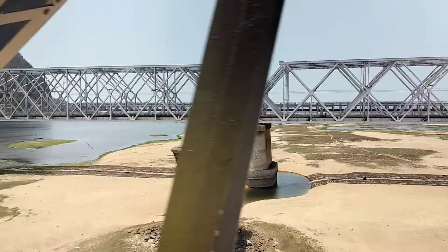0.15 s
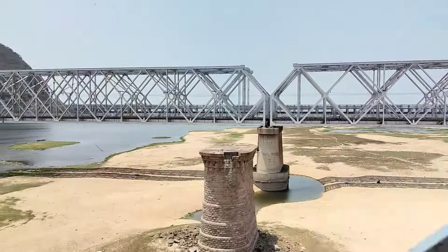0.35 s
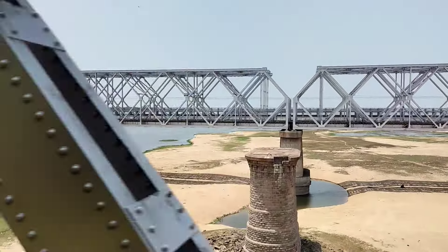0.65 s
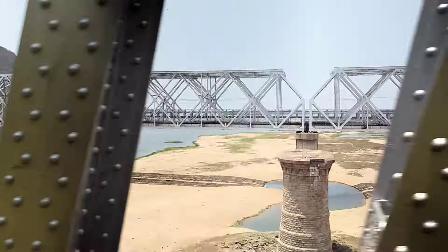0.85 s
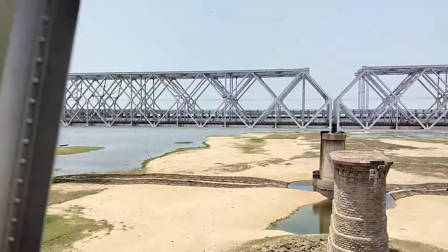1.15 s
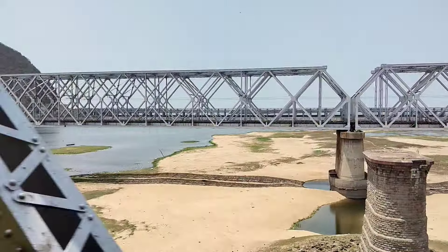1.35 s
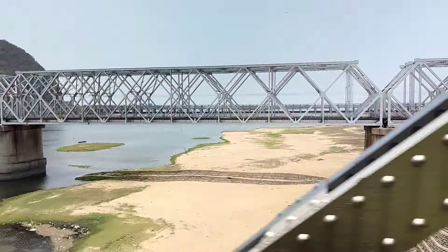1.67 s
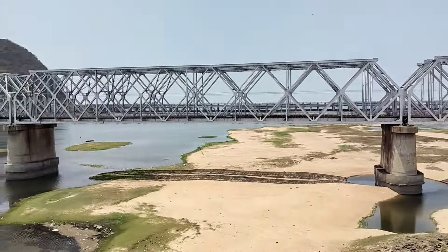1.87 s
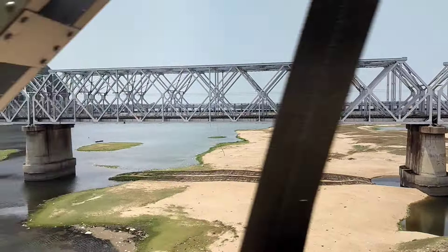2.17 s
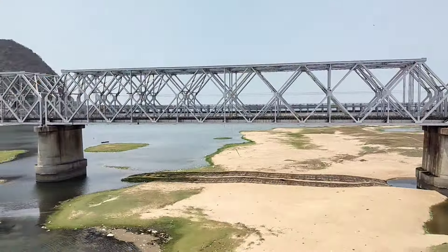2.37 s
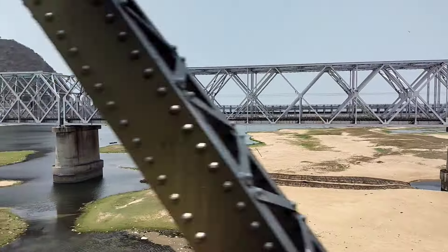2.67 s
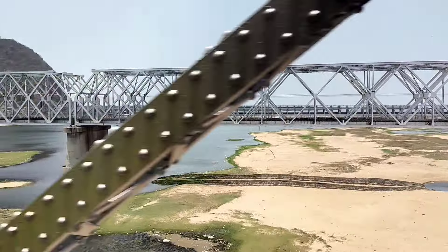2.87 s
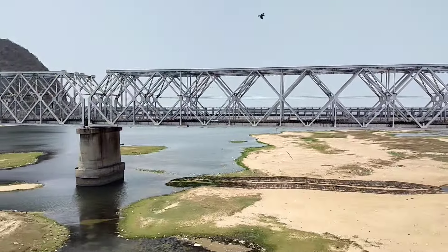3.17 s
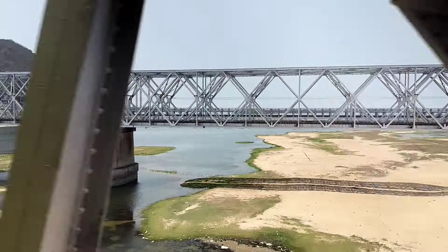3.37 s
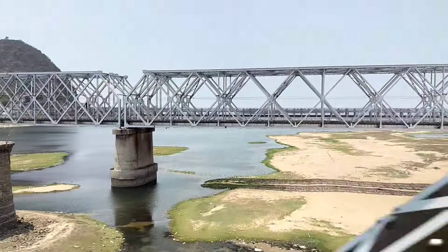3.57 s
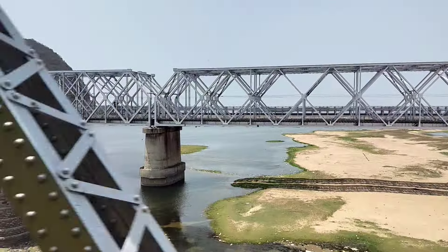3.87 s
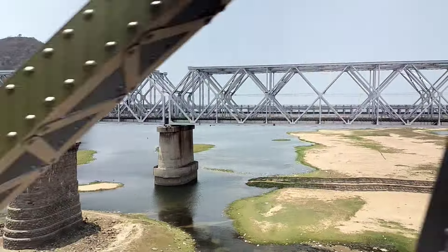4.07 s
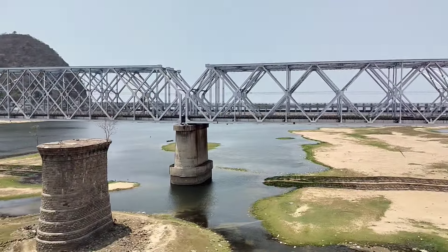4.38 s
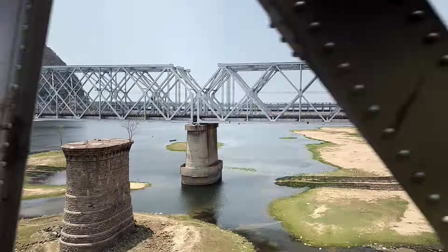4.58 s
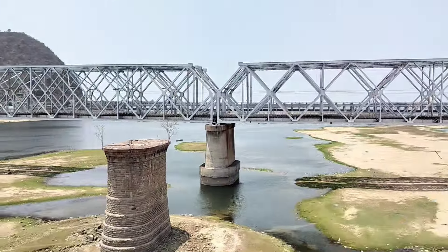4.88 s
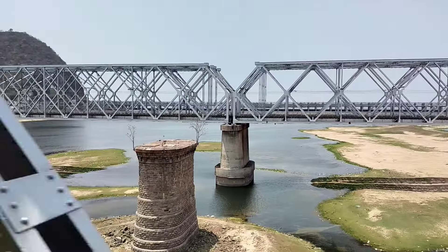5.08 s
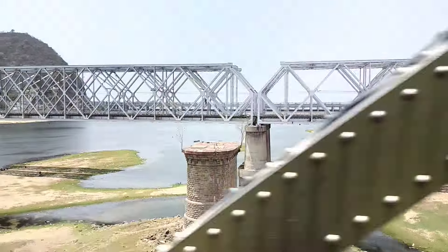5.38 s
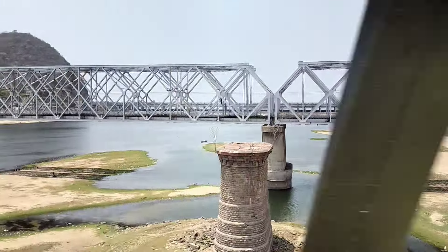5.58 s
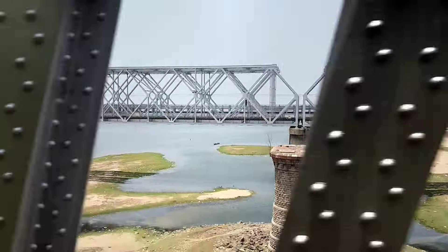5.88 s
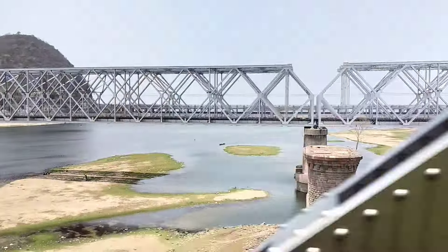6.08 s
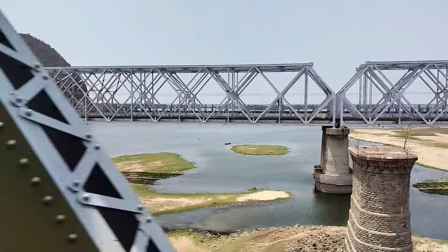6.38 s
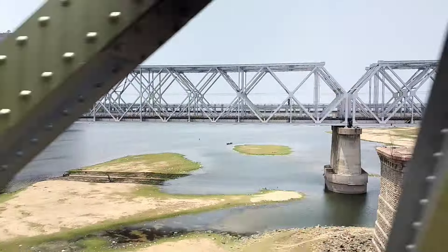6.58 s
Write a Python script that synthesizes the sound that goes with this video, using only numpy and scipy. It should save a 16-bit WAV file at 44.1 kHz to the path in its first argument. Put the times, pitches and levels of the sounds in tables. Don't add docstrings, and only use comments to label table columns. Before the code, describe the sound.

From an open window of a train crossing a riveted steel bridge, low droning rumble and rough wheel hiss run throughout. A dense burst of rattling blows peaks in a sharp metallic crack at about 0.7 seconds, then thins to quieter rumble with thuds, pings and distant clatter. Girder booms strengthen around four seconds, and loud clanking joint blows return after five before fading a little. Close, full, loud stereo.

```python
import sys
import numpy as np
from scipy import signal
from scipy.fft import rfft, irfft, next_fast_len
from scipy.io import wavfile
from scipy.ndimage import uniform_filter1d, map_coordinates

SR = 44100
rng = np.random.default_rng(int(sys.argv[2]) if len(sys.argv) > 2 else 0)


def inscribe(sig):
    pcm = np.round(np.clip(np.atleast_2d(sig).T, -1, 1) * 32767)
    wavfile.write(sys.argv[1], SR, pcm.astype(np.int16))


def undo_db(level):
    steps = np.asarray(level, float) / 20
    return 10 ** steps


N = 297234

# (time [s], load on the span [dB], nearness of the wheels [dB])
RIDE = [(0.0, -20, -32), (0.15, -19, -32), (0.79, -20, -24), (1.07, -23, -29.5), (1.52, -27, -38.5),
        (1.84, -25.5, -39), (2.23, -24, -37.5), (3.25, -22.5, -37), (3.45, -22.5, -35), (4.45, -21, -34),
        (5.07, -22, -34.5), (5.39, -17.5, -33), (5.72, -26, -32), (5.89, -20.5, -31), (6.04, -23.5, -32.5),
        (6.34, -22, -37.5), (6.61, -22, -39), (6.74, -25, -40.5)]
# (time [s], level [dB], length [s])
HEAVES = [(0.304, -16.5, 0.15), (0.389, -21, 0.06), (0.559, -21, 0.061), (0.688, -18, 0.11),
          (0.873, -16.5, 0.078), (0.983, -26, 0.1), (1.287, -22.5, 0.184), (1.596, -26, 0.046),
          (1.666, -23, 0.052), (1.956, -30, 0.056), (2.405, -33, 0.11), (3.168, -36, 0.102),
          (3.347, -31, 0.055), (4.081, -30, 0.2), (4.734, -24, 0.28), (5.293, -17, 0.023),
          (5.423, -10, 0.037), (5.542, -20, 0.2), (5.667, -15, 0.2), (5.961, -27, 0.082),
          (6.181, -23.5, 0.27), (6.326, -19, 0.042), (5.77, -22, 0.064), (0.095, -25, 0.048)]
# (time [s], level [dB], length [s])
ROAR_SWELLS = [(0.269, -13.5, 0.13), (0.379, -13, 0.023), (0.439, -12.5, 0.024), (0.733, -11.5, 0.051),
               (0.895, -11.5, 0.085), (0.973, -14.5, 0.073), (1.297, -14, 0.074), (1.407, -16.5, 0.12),
               (1.507, -17.5, 0.12), (1.646, -26, 0.021), (2.265, -20, 0.21), (2.499, -20, 0.17),
               (2.873, -18, 0.09), (2.953, -19, 0.027), (3.362, -17, 0.021), (3.766, -16, 0.025),
               (3.906, -23, 0.032), (4.041, -16, 0.053), (4.435, -19.5, 0.12), (4.605, -14.5, 0.097),
               (4.704, -16, 0.046), (4.779, -22, 0.12), (5.193, -13.5, 0.019), (5.413, -19, 0.026),
               (5.478, -18.5, 0.24), (5.592, -15, 0.096), (5.765, -8.5, 0.058), (5.897, -12, 0.042),
               (5.81, -14, 0.066), (5.94, -18, 0.054), (.19, -14, 0.035), (3.9, -23, 0.056),
               (6.006, -14, 0.056), (6.276, -15.5, 0.043)]
# (time [s], length [s], depth [dB])
LULL = (.138, .035, -13)
# (time [s], length [s], depth [dB])
HUSHES = [
    (0.464, 0.11, -4.5),
    (0.8, 0.091, -11),
    (1.065, 0.026, -18),
    (1.255, .025, -7),
    (3.583, 0.028, -2.5),
    (6.253, .025, -1.5),
    (6.387, .025, -6),
]
# (time [s], length [s], change [dB])
RESTS = [
    (0.53, 0.092, -2),
    (1.605, 0.058, 1.5),
    (2.556, 0.093, -1.5),
    (4.57, 0.023, -11),
    (6.103, 0.057, -2.5),
    (6.25, 0.03, -7),
    (6.62, 0.069, -3.5),
]
# (time [s], level [dB], length [s])
SINGS = [
    (1.12, -30, 0.067),
    (3.5, -33.5, 0.092),
    (3.62, -29.5, 0.046),
    (3.72, -29, 0.04),
    (4.0, -29, 0.047),
    (4.45, -38, 0.33),
    (4.7, -33, 0.25),
    (5.4, -36, 0.11),
    (5.95, -37, 0.21),
    (6.3, -33, 0.039),
]
# (centre [Hz], width [Hz], level [dB])
SPAN = [(38, 104, -10), (73.8, 14.5, 4)]
# (centre [Hz], width [Hz], level [dB])
GIRDER = [(109, 18, -11.5), (121, 19, -2.5), (158.2, 14, -5.5)]
# (centre [Hz], width [Hz], level over the drone [dB])
RAIL = [(308.5, 80, 3), (445.4, 16, 6.5), (642, 74, 3.5), (925, 97, 5.5), (1204, 110, 9.5)]
# (centre [Hz], width [Hz], level over the hiss [dB])
PLATES = [(1860, 50, -1.5), (2310, 120, 0), (4110, 120, -1.5), (6050, 110, -1.5), (9500, 200, 2.5),
          (11900, 200, -5)]
# (frequency [Hz], level [dB])
DRONE = [(120, -61), (180, -3.5), (250, -1), (500, -10), (1000, -14.5), (1400, -26), (1900, -40),
         (2700, -120)]
# (frequency [Hz], level [dB])
HISS = [(760, -14.5), (1300, -3.5), (1690, -3.5), (2320, -4.5), (2900, -8.5), (3700, -14), (4600, -13.5),
        (5200, -18), (6400, -20), (7800, -29), (9000, -41), (11000, -91)]
# (frequency [Hz], level [dB])
SIZZLE = [(6500, -13), (8600, -1.5), (9500, -1.5), (11800, -1), (14000, -7), (15000, -12), (15800, -13)]
# (frequency [Hz], level [dB])
CLATTER = [(760, -20), (1300, 2), (1580, -6.5), (1980, -1), (2650, -2), (3250, -5.5), (4320, -6),
           (5440, -10.5), (6120, -9.5), (7580, -17), (8600, -25.5), (11200, -58), (18900, -120)]
# (frequency [Hz], level [dB])
SPRAY = [(5060, -17), (8600, -8), (12300, -11.5), (15600, -19)]
# (frequency [Hz], level [dB])
KNOCK = [(150, -31), (250, -1), (404, 11.5), (445, -6), (487, 9.5), (901, -0.5), (1500, -10), (1950, -59),
         (3300, -120)]
# (frequency [Hz], correlation [-1 to 1])
ALIKE = [(30, .65), (60, .965), (130, .995), (200, .955), (290, .73), (450, .5), (740, .33), (1300, -.25),
         (2000, .03), (15000, 0)]
# (frequency [Hz], left minus right [dB])
LEAN = [(60, 0.5), (110, 0.29), (200, 1.3), (380, 2.2), (700, 1.4), (1290, 3), (2380, 2.9), (4400, 1.6),
        (8120, 0.61), (15000, 9.2)]
# (time [s], peak [dB], plate pitch [Hz])
THUDS = [(0.016, -15, 219), (0.171, -9.5, 230), (0.249, -9, 222), (0.295, -7, 288), (0.332, -8.5, 343),
         (0.58, -10, 238), (0.676, -15, 189), (0.793, -10.5, 301), (0.972, -19, 254), (1.029, -12, 198),
         (1.468, -11, 229), (1.64, -9.5, 212.5), (1.825, -15, 280), (1.911, -15, 306), (2.122, -12.5, 346),
         (2.268, -11.5, 272), (2.745, -14, 295), (2.882, -13.5, 257), (2.953, -15, 285), (3.346, -15, 264),
         (3.43, -13.5, 229), (3.475, -6.5, 234), (3.655, -12.5, 293.5), (3.762, -12, 199),
         (3.813, -9.5, 291), (3.911, -21, 250), (3.996, -12.5, 302), (4.163, -12, 295), (4.347, -10, 251),
         (4.619, -13, 195), (4.708, -18, 191), (4.75, -11.5, 289), (4.829, -11, 223), (4.937, -16, 297),
         (4.976, -12, 248), (5.042, -10, 240), (5.153, -13, 354), (5.262, -13, 284), (5.537, -17, 297),
         (5.725, -12.5, 306), (5.828, -7.5, 257), (5.998, -6, 229), (6.268, -28, 237), (6.5, -9.5, 297.5)]
# (time [s], peak [dB], pitch [Hz])
TICKS = [(0.0453, -28, 2080), (0.186, -25, 1790), (0.3321, -12, 1980), (0.4389, -22, 1960),
         (0.4648, -21, 2100), (0.5038, -14, 2700), (0.5931, -16, 2140), (0.6848, -10, 2140),
         (0.8579, -29, 2350), (1.1, -13, 1900), (1.278, -14, 1860), (1.3473, -24, 2350),
         (2.7197, -22, 1820), (3.3732, -18, 2520), (3.6175, -20, 1910), (3.9883, -19, 2200),
         (4.1365, -26, 1840), (4.1894, -25, 1690), (4.2855, -17, 1880), (4.6578, -18, 1740),
         (4.7431, -13, 1700), (4.8609, -24, 2250), (4.8912, -26, 2530), (5.0689, -25, 1700),
         (5.1397, -23, 1770), (5.4056, -19, 1920), (5.5523, -20, 2440), (5.6845, -17, 1760),
         (5.7428, -18, 2010), (5.7793, -11, 2540), (5.9045, -20, 2060), (6.1554, -21, 1860),
         (6.2756, -19, 2300), (6.4178, -15, 2020), (0.958, -13, 1940), (0.978, -14, 1830),
         (1.128, -17, 2300), (1.188, -12, 1920)]
# (time [s], peak [dB], pitch [Hz])
PINGS = [(0.183, -26, 680), (0.24, -14, 599), (0.321, -10.5, 826), (0.47, -11, 930), (0.563, -15, 640),
         (0.691, -11, 953), (0.755, -16, 529), (0.832, -16, 890), (1.241, -18, 576), (2.104, -15.5, 632),
         (2.522, -24, 600), (2.674, -19, 897), (2.728, -20, 930), (2.803, -20, 698), (3.013, -20, 900),
         (3.3, -15, 684), (3.455, -18, 897), (3.514, -15, 887), (3.601, -9, 612), (3.71, -15, 870),
         (3.927, -22, 580), (4.031, -17, 608), (4.318, -14, 880), (4.459, -16, 960), (4.564, -12, 923),
         (4.61, -12, 930), (4.745, -21, 894), (4.808, -20, 677), (4.968, -23, 630), (5.177, -23, 605),
         (5.305, -11, 703), (5.358, -27, 590), (5.543, -18, 1004), (5.714, -24, 566), (5.793, -19, 614),
         (5.931, -11, 593), (6.136, -14, 894), (6.217, -12, 687), (6.262, -21, 633), (6.577, -22, 1060)]
# (time [s], peak [dB], pitch [Hz])
BOOMS = [(0.185, -8, 127), (0.255, -1.5, 118), (0.368, 0, 133), (0.513, -7, 130), (0.722, 0, 139),
         (0.879, -0.5, 111), (1.286, -0.5, 120), (2.489, -10, 115), (3.009, -17, 121), (3.228, -16, 116),
         (3.444, -13, 127), (3.667, -10, 135), (3.887, 1, 109), (4.027, -0.5, 117), (4.081, -5.5, 132.5),
         (4.417, 1, 129), (4.766, -0.5, 134), (5.115, -10, 122), (5.18, -5, 127), (5.465, -1, 117),
         (5.54, -4, 107.7), (5.659, -13, 92.5), (5.75, 2, 124.5), (5.883, -6, 147), (6.256, -6, 121),
         (6.648, -10, 141), (0.96, -3, 106), (1.115, -6, 135), (1.185, -5.5, 130)]
# (time [s], peak [dB], sizzle [dB], knock [dB], rise [s])
NEAR_BLOWS = [(.194, -17, -30, 2, 0.0077), (.3285, -13.5, -28, -5, 0.012), (.5033, -14.5, -30, -12, 0.024),
              (.6294, -7.5, -31, 4, 0.03), (.6885, -4, -26.5, 1.5, 0.011), (.7594, -11, -32, -2, 0.021),
              (.859, -13.5, -25, 11, 0.022), (.9394, -17, -22, -3, 0.011), (.9994, -12.5, -29, -11, 0.028),
              (1.1004, -27.5, -38, 17, 0.0058), (1.1694, -18, -27, -30, 0.01),
              (1.2764, -20, -32, -30, 0.011), (1.4294, -25, -42, 1, .006)]
# (time [s], peak [dB], sizzle [dB], knock [dB], rise [s])
NEXT_BLOWS = [(5.2894, -15.5, -31, 3, 0.014), (5.4036, -15, -33, 11, 0.0098),
              (5.4594, -14.5, -33, -12, 0.019), (5.5494, -24.5, -37, -6, .01),
              (5.6855, -18.5, -29, 14, 0.013), (5.7394, -15.5, -27, 11, 0.013),
              (5.7994, -13, -30, -6, 0.019), (5.8994, -17, -28, 17, 0.027), (5.9654, -8, -29, -4, 0.03),
              (5.85, -24, -29, -6, 0.021), (6.0194, -17, -29, -7, 0.014), (6.1794, -18.5, -36, 16.5, 0.025),
              (6.2756, -20.5, -37, 16, 0.0024), (6.3194, -15.5, -34, -3, 0.015),
              (6.4394, -16, -32, 4, 0.017), (6.6194, -30.5, -38, -13, .007), (6.6994, -42, -14, 3, .007)]
# (time [s], peak [dB], sizzle [dB], knock [dB])
FAR_BLOWS = [(1.7694, -37, -26, 8), (1.8144, -25, -42, -3), (2.0994, -29, -36, 22.5),
             (2.1894, -32, -32, 13), (2.2894, -24.5, -33, 7), (2.4394, -26.5, -36, 2),
             (2.5854, -43, -37, 0), (2.7134, -24, -36, 21.5), (2.8694, -24, -39, 14), (3.0394, -27, -40, 6),
             (3.1936, -33, -38, 12), (3.3294, -23.5, -40, 13), (3.4994, -23, -29, 4), (3.8594, -26, -23, 5),
             (3.9094, -25, -32, 6), (3.9883, -20, -28, -6), (4.0494, -21.5, -39, -12),
             (4.1794, -22.5, -33, 15), (4.2694, -25, -37, 9), (4.3194, -20.5, -41, 6),
             (4.3994, -22.5, -26, 10), (4.5194, -22.5, -35, 22), (4.6794, -23.5, -31.5, 10),
             (4.7426, -19.5, -43, -5), (4.893, -18, -30, -8), (4.9154, -17, -31, -6),
             (5.0294, -40, -38, -2), (5.1364, -35, -37, 11), (5.1894, -21, -36, 2)]
# (time [s], pitch [Hz], level [dB], t60 [s], width [Hz])
SQUEAKS = [(.689, 3700, -16, .12, 900), (.688, 9200, -27, .08, 400), (.688, 12500, -24, .04, 4000),
           (.688, 2200, -12, .06, 900), (.689, 5900, -13, .07, 250), (.943, 11900, -27, .07, 150),
           (1.005, 11950, -35, .3, 350), (1.1, 2100, -25, .2, 300), (1.772, 9600, -56, .08, 150),
           (2.097, 14800, -58, .1, 150), (2.09, 11400, -58, .15, 150), (6.276, 2400, -25, .35, 150),
           (3.205, 4200, -34, .2, 80), (3.985, 14500, -43, .25, 1500), (3.99, 2250, -37, .15, 300),
           (4.05, 4200, -33, .15, 150), (4.33, 4300, -36, .2, 150), (4.915, 13000, -47, .15, 3000),
           (5.45, 6000, -34, .1, 120), (5.73, 480, -11, .6, 200), (5.93, 600, -15, .5, 250),
           (.68, 420, -13, .4, 200), (5.4, 400, -14, .4, 200)]
# (time [s], peak [dB], pitch [Hz])
CRACKS = [
    (.6858, -15, 2000),
    (.6882, -13, 4200),
    (.6912, -6, 2000),
    (.6942, -9, 3000),
    (.6995, -7, 1800),
    (.7248, -10, 2300),
    (6.277, -18, 2500),
    (6.2851, -19, 4800),
]

THUMP_DB, THUMP_GROWS, BOOM_DB, BOOM_GROWS = -4.5, 0.98, 2, 1.13
SIZZLE_DB, SIZZLE_GROWS = -27.5, 1.26
DECK_SHARE_DB = -9.5
NEAR_T60_S, NEXT_T60_S, FAR_T60_S, FAR_RISE_S = 0.52, 0.51, 0.26, 0.0085
HARD_DB, HARD_SHORTENS = -12, 0.49
ANSWER_DB, ANSWER_TREBLE_DB, ANSWER_T60_FACTOR, ANSWER_SLOWER = -3.5, -22, 0.81, 5


def unit(x):
    return x / np.sqrt(np.mean(x ** 2) + 1e-20)


def along(points, hz):
    f, v = np.transpose(points)
    return np.interp(np.log(hz + 1), np.log(f + 1), v)


def colour(points):
    return lambda hz: undo_db(along(points, hz))


def modes(rows, f):
    power = 0
    for centre, width, db in rows:
        damping = (f * width) ** 2
        power = power + undo_db(2 * db) * damping / ((centre * centre - f * f) ** 2 + damping)
    return power


def filtered(x, response):
    m = next_fast_len(N + 8192)
    return irfft(rfft(x, m) * response(np.fft.rfftfreq(m, 1 / SR)), m)[..., :N]


def wobble(rate):
    knots = rng.standard_normal(int(N * rate / SR) + 4)
    return map_coordinates(knots, [np.arange(N) * rate / SR])


def rush(gain, patchy_db):
    z = signal.stft(rng.standard_normal((2, N)), nperseg=512)[2]
    field = uniform_filter1d(rng.standard_normal(z.shape[1:]), size=5, axis=0)
    field = uniform_filter1d(field, size=8, axis=1)
    pair = signal.istft(z * undo_db(patchy_db * unit(field)), nperseg=512)[1][:, :N]

    def mid_side_gain(hz):
        angle = np.arccos(np.clip(along(ALIKE, hz), -1, 1)) / 2
        return gain(hz) * np.array([np.cos(angle), np.sin(angle)])

    mid, side = filtered(pair, mid_side_gain)
    both = np.array([mid + side, mid - side])
    return both / np.sqrt(np.mean(mid ** 2))


def steadied(x, seconds, share):
    power = np.abs(uniform_filter1d(np.mean(x, 0) ** 2, size=int(seconds * SR)))
    return x / (power + 0.021) ** (share / 2) * np.sqrt(1 - 0.027 * share)


def swell(s, db, t60, rise):
    out = np.zeros(N + SR)
    a = max(round((s - 0.5 * rise) * SR), 0)
    t = np.arange(SR // 2) / SR
    decay = undo_db(db - 60 * t / max(t60, .02))
    out[a:a + SR // 2] = decay * (1 - np.exp(-t / max(rise, 5e-4)))
    return out[:N]


def humps(rows, wide):
    t = np.arange(0, N + 64, 64) / SR
    power = sum(undo_db(2 * db) * np.exp(-((t - s) / (wide * length)) ** 2) for s, db, length in rows)
    return np.interp(np.arange(N) / SR, t, power)


def dips(rows, power=2):
    t = np.arange(N) / SR
    return sum(db * np.exp(-((t - s) / length) ** power) for s, length, db in rows)


def curves(rows):
    s, *cols = np.transpose(rows)
    return [np.interp(np.arange(N) / SR, s, c) for c in cols]


def blows():
    rows = []
    for table, t60 in ((NEAR_BLOWS, NEAR_T60_S), (NEXT_BLOWS, NEXT_T60_S)):
        for s, db, sizzle_db, knock_db, rise in table:
            shortened = t60 * undo_db(-HARD_SHORTENS * max(db - HARD_DB, 0))
            rows.append((s, db, sizzle_db, knock_db, shortened, rise))
    return rows + [(*row, FAR_T60_S, FAR_RISE_S) for row in FAR_BLOWS]


def levels():
    load_db, near_db = curves(RIDE)

    def grown(db, grows):
        return db.mean() + grows * (db - db.mean())

    lull_db = dips([LULL], power=8)
    near_db = near_db + dips(HUSHES)
    roar_swell = humps(ROAR_SWELLS, wide=0.47)
    answer = np.zeros(N)
    for s, db, _, _, t60, rise in blows():
        answer += swell(s, db + ANSWER_DB, ANSWER_T60_FACTOR * t60, ANSWER_SLOWER * rise) ** 2
    floors = [grown(load_db, THUMP_GROWS) + THUMP_DB + lull_db,
              grown(load_db, BOOM_GROWS) + BOOM_DB + lull_db,
              load_db - 0.3 + 0.72 * lull_db + dips(RESTS),
              near_db + 0.13 * lull_db,
              grown(near_db, SIZZLE_GROWS) + SIZZLE_DB]
    swells = [humps(HEAVES, wide=0.38), roar_swell, undo_db(2 * DECK_SHARE_DB) * roar_swell,
              answer, undo_db(2 * ANSWER_TREBLE_DB) * answer]
    return [10 * np.log10(undo_db(2 * db) + power) for db, power in zip(floors, swells)]


def heavy_steel(rows):
    return lambda f: f ** 2 / (f ** 2 + 55 ** 2) / (1 + (f / 260) ** 4) * np.sqrt(modes(rows, f))


def span_and_girders(thump_db, boom_db):
    thump = steadied(rush(heavy_steel(SPAN), patchy_db=.3), .08, share=.75)
    boom = steadied(rush(heavy_steel(GIRDER), patchy_db=.3), .04, share=0.85)
    return undo_db(thump_db) * thump + undo_db(boom_db) * boom


def deck_drone(drone_db):
    gain = lambda f: colour(DRONE)(f) * np.sqrt(1 + modes(RAIL, f))
    return undo_db(drone_db) * steadied(rush(gain, patchy_db=0.7), 0.054, share=0.22)


def rail_song(drone_db):
    waver_db = 1.2 * wobble(7)
    power = undo_db(2 * (drone_db - 17.0 + waver_db)) + humps(SINGS, wide=0.61)
    return np.sqrt(power) * rush(lambda f: modes([(897, 110, 0)], f), patchy_db=1.0)


def flecks(count=900):
    when, pitch, size, pan = rng.random((count, 4)).T
    hz = 900 * 6.5 ** pitch
    t = np.arange(1300) / SR
    decay = undo_db(-60 * t * hz[:, None] / 75)
    ring = np.sin(2 * np.pi * hz[:, None] * t) * decay * (1 - np.exp(-t / 0.00064))
    ring *= (undo_db(-3.5 * np.log(size + 0.077)) * colour(HISS)(hz))[:, None]
    at = ((when * N).astype(int)[:, None] + np.arange(len(t))).ravel()
    both = []
    for gain in (np.sqrt(pan), np.sqrt(1 - pan)):
        both.append(np.bincount(at, (ring * gain[:, None]).ravel(), N + len(t))[:N])
    return unit(np.array(both))


def wheel_hiss(hiss_db, sizzle_db):
    plated = lambda points: lambda f: colour(points)(f) * np.sqrt(1 + modes(PLATES, f))
    shake = wobble(8.5)
    hiss = rush(plated(HISS), patchy_db=1.1) + undo_db(-10.5) * flecks()
    sizzle = rush(plated(SIZZLE), patchy_db=0.5)
    return (undo_db(hiss_db - 1.2 + 0.18 * shake) * hiss
            + undo_db(sizzle_db - 2.5 + .6 * shake + .8 * wobble(60)) * sizzle)


def rolling():
    thump_db, boom_db, drone_db, hiss_db, sizzle_db = levels()
    low = span_and_girders(thump_db, boom_db) + deck_drone(drone_db)
    return low + rail_song(drone_db) + wheel_hiss(hiss_db, sizzle_db)


def rings(rows, gain_db, t60, rise, width_hz, alike):
    out, t = np.zeros((2, N + SR)), np.arange(SR // 5) / SR
    for s, db, hz in rows:
        walk = np.cumsum(rng.standard_normal(len(t)))
        drift = uniform_filter1d(walk, size=100) * np.sqrt(2 * np.pi * width_hz / SR)
        turn = np.arccos(np.clip(alike, -1, 1)) * rng.uniform(-1.28, 1) * np.array([[1], [-1]])
        shape = undo_db(db + gain_db - 60 * t / max(t60, .02)) * (1 - np.exp(-t / max(rise, 5e-4)))
        out[:, round(s * SR):][:, :len(t)] += shape * np.sin(2 * np.pi * hz * t + drift + turn)
    return out[:, :N]


def deck_thuds():
    return rings(THUDS, -4, t60=0.21, rise=0.0032, width_hz=10.8, alike=1.0)


def bolt_ticks():
    return rings(TICKS, -10.0, t60=0.075, rise=0.0016, width_hz=140, alike=.1)


def rail_pings():
    return rings(PINGS, -5.5, t60=0.16, rise=0.0036, width_hz=16, alike=-0.33)


def girder_booms():
    return rings(BOOMS, -1.5, t60=0.15, rise=0.0071, width_hz=2.9, alike=1.0)


def clatter():
    power = np.zeros((3, N))
    for s, db, sizzle_db, knock_db, t60, rise in blows():
        power[0] += swell(s, db - 12.0, t60, rise) ** 2
        power[1] += swell(s, db + sizzle_db - 4.0, 0.87 * t60, 0.41 * rise) ** 2
        power[2] += swell(s, db + knock_db - 18.5, 1.44 * t60, rise) ** 2
    plates, spray, knock = np.sqrt(power)
    rattle = wobble(120)
    return (plates * undo_db(0.8 * rattle) * rush(colour(CLATTER), patchy_db=1.2)
            + spray * undo_db(1.7 * rattle) * rush(colour(SPRAY), patchy_db=1.5)
            + knock * rush(colour(KNOCK), patchy_db=0.5))


def squeaks():
    out = np.zeros(N)
    t = np.arange(SR // 3) / SR
    for s, hz, db, t60, width in SQUEAKS:
        a, cycle = round(s * SR), int(SR / hz)
        drift = np.cumsum(rng.standard_normal(len(t))) * np.sqrt(2 * np.pi * width / SR)
        drift = uniform_filter1d(uniform_filter1d(drift, size=cycle), size=cycle)
        shape = swell(s, db, t60, 0.001)[a:a + len(t)]
        out[a:a + len(t)] += shape * np.sin(2 * np.pi * hz * t + drift)
    return np.array([out, undo_db(-10.0) * np.roll(out, -17)])


def cracks():
    crack = rings(CRACKS, 0.0, t60=.02, rise=5e-4, width_hz=1200, alike=.3)
    return crack * undo_db([[2], [-3]])


def scene():
    steel = rolling() + deck_thuds() + bolt_ticks() + rail_pings() + girder_booms() + clatter() + cracks()
    leaning = filtered(steel, lambda hz: undo_db(along(LEAN, hz) * [[.5], [-.5]]))
    return leaning + squeaks()


def low_pass(x):
    return signal.sosfilt(signal.butter(12, 15770, fs=SR, output="sos"), x)


def record(dry):
    mix = dry / (1 + np.abs(dry / 1.1) ** 4) ** (1 / 4)
    return low_pass(mix)


dry = scene()
out = record(dry)
inscribe(out)
```